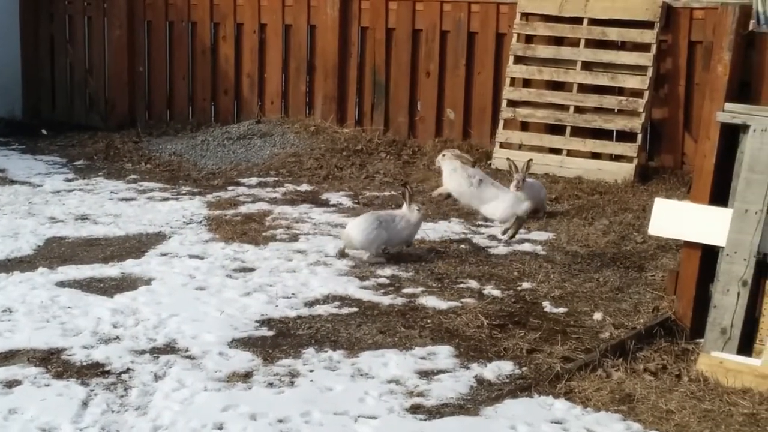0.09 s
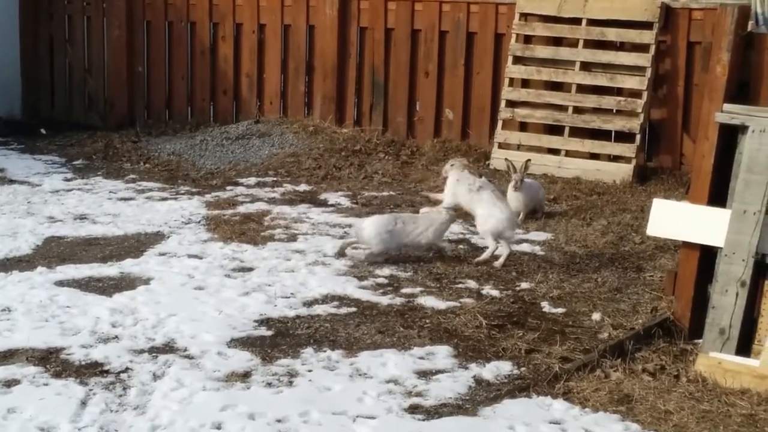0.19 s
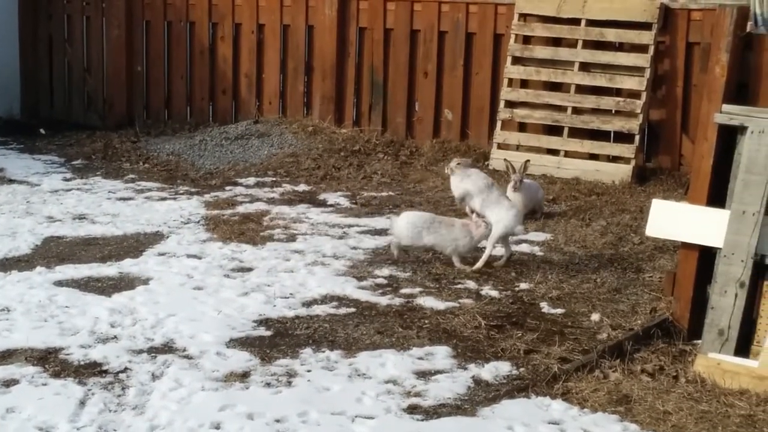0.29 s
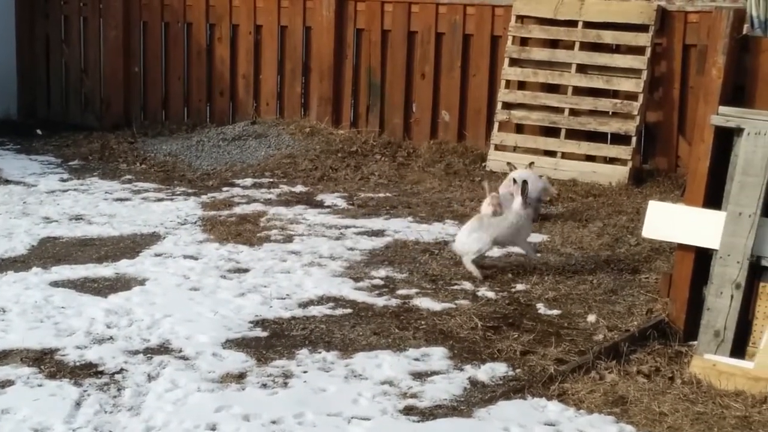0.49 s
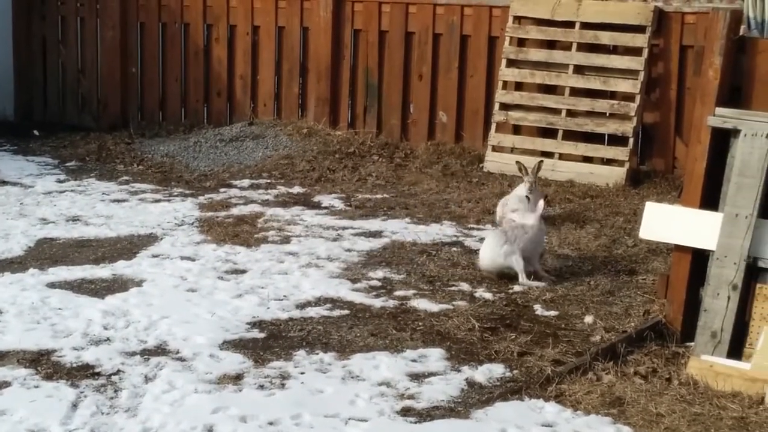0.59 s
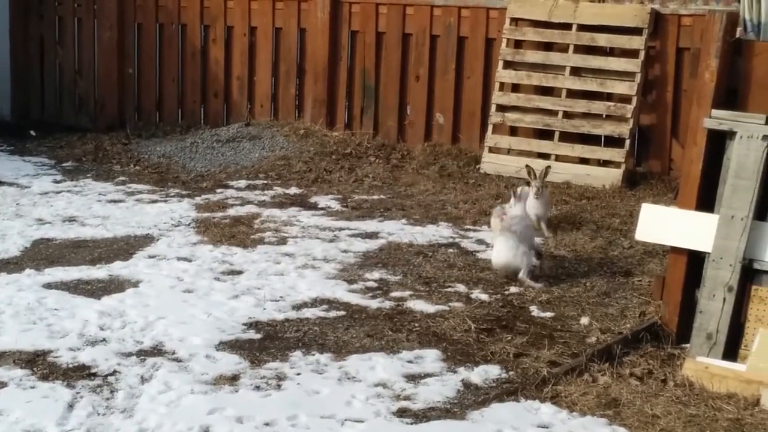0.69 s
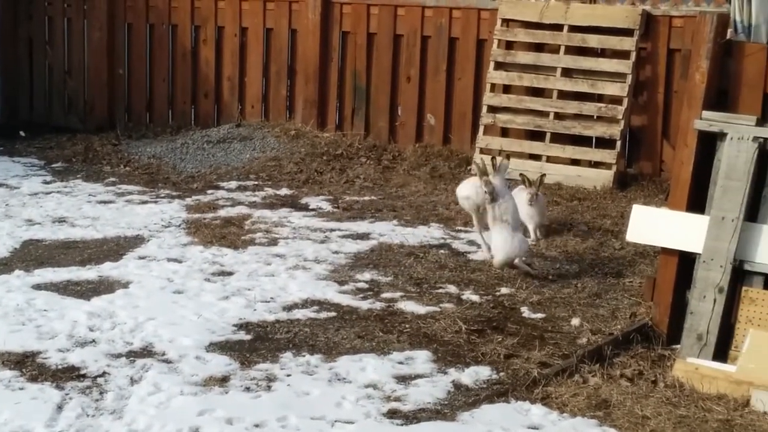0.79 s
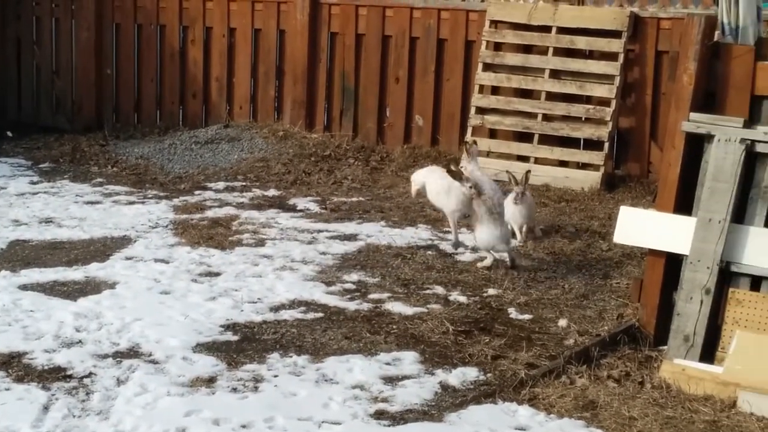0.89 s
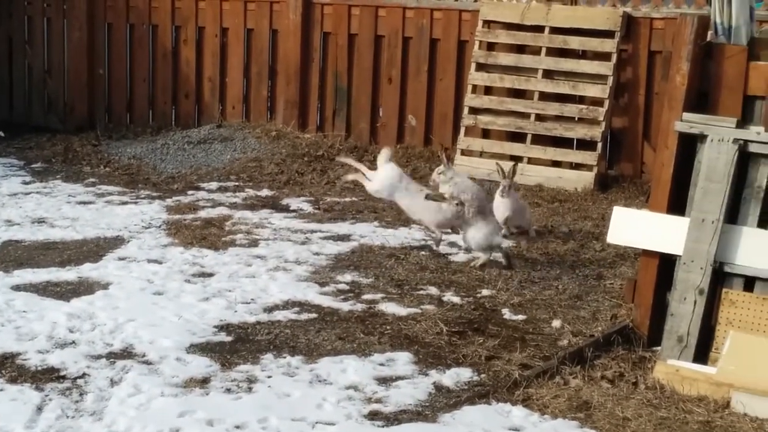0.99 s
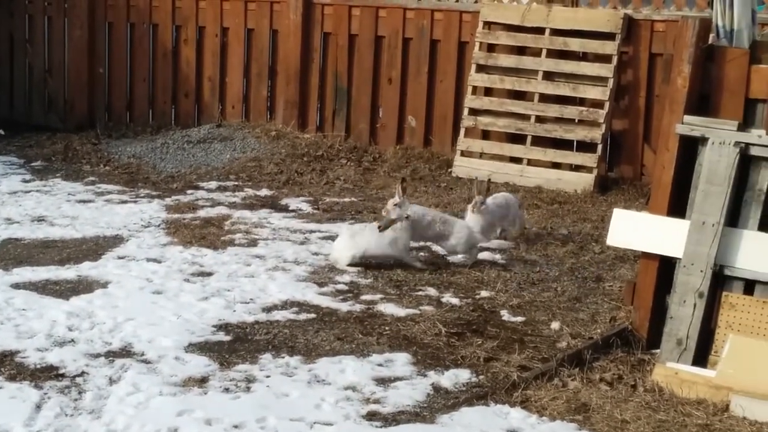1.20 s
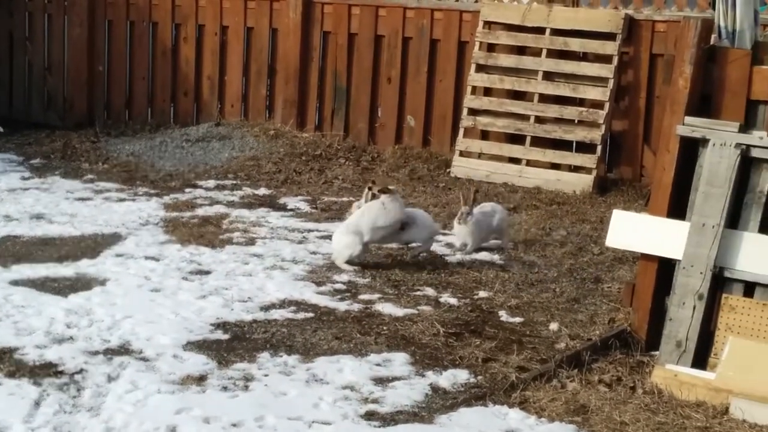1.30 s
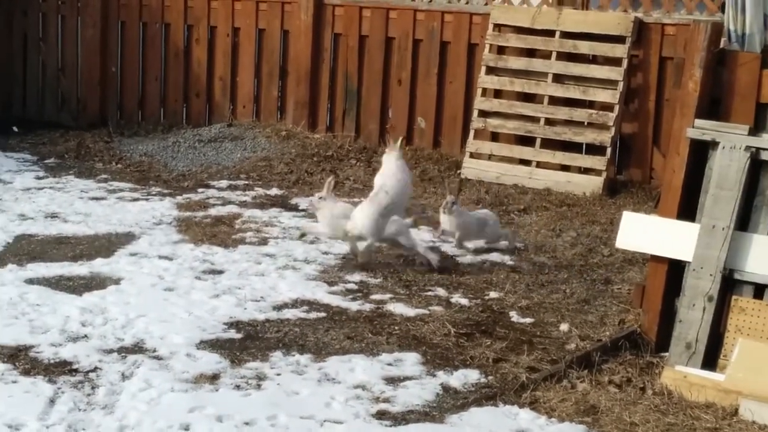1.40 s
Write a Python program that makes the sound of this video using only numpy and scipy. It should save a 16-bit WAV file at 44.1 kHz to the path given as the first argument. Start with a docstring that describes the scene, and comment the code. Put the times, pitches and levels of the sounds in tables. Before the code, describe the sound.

Hares grunt gruffly while scuffling in a quiet fenced yard. A clipped low grunt opens, then a breathy falling one at 0.2 s with soft paw thumps near 0.1 and 0.2. The loudest, raspiest grunt runs 0.4-0.65 s. Small low grunts follow, a rough one at 0.92, a faint grass snap at 0.98, a higher falling grunt at 1.08, another at 1.17, and a weak last one at 1.32.

```python
"""A fenced yard, a few metres from the hares scuffling in it: quick gruff grunts, paws and short echoes.
Each grunt is a train of vocal-fold pulses: a soft hum at the pitch, and sharp pulses with
breath ringing a short throat. Paws thump the ground as low decaying pushes and one snaps dry grass,
over a faint outdoor floor of coloured noise."""
import sys
import numpy as np
from scipy import signal
from scipy.fft import rfft, irfft
from scipy.io import wavfile
from scipy.ndimage import uniform_filter1d

SR = 44100
rng = np.random.default_rng(int(sys.argv[2]) if len(sys.argv) > 2 else 0)


def convert_level_to_amplitude(level_db):
    """Map a level in decibels to its linear amplitude factor."""
    exponent = np.asarray(level_db, float) / 20
    return 10 ** exponent


def log_audio(samples):
    """Write samples as a 16-bit WAV file to the path given in sys.argv[1]."""
    # one column per channel
    frames = np.atleast_2d(samples).T
    # limit to full scale, then quantise
    limited = np.clip(frames, -1, 1)
    pcm = np.round(limited * 32767).astype(np.int16)
    wavfile.write(sys.argv[1], SR, pcm)


N = 63945


def evened(x):
    """Scales to rms 1."""
    return x / np.sqrt(np.mean(x ** 2) + 1e-20)


def add(mix, s, sound):
    """Mixes a sound in at time s, in seconds."""
    part = mix[round(s * SR):][:len(sound)]
    part += sound[:len(part)]


def resonate(x, hz, width):
    """A resonance applied twice that follows the curve hz."""
    turn = np.exp(2j * np.pi * np.cumsum(hz * np.ones(len(x))) / SR)
    r = np.exp(-np.pi * width / SR)
    smooth = signal.lfilter([(1 - r) ** 2], [1, -2 * r, r * r], x / turn + 1e-18)
    return 2 * (turn * smooth).real


def outdoor_floor():
    """Steady faint noise, shaped in the spectrum to lean towards the low end."""
    # Spectrum of the floor. Each row: frequency in Hz, relative level in dB.
    floor_spectrum = [(35, -13.5), (60, -4), (756, -11), (2650, -30), (15500, -29.5)]
    floor_db = -67.5
    f, level_db = np.transpose(floor_spectrum)
    hz = np.fft.rfftfreq(N, 1 / SR)
    shape = convert_level_to_amplitude(np.interp(np.log(hz + 1), np.log(f), level_db))
    return convert_level_to_amplitude(floor_db) * evened(irfft(rfft(rng.standard_normal(N)) * shape, N))


def yard_echoes(x):
    """Sparse echoes off fence and ground, dying quickly."""
    t60_s, echo_db = 0.083, -9.5
    taps = np.zeros(SR // 2)
    at = np.arange(300, SR // 2 - 20, 20)  # one echo of random sign in every 20 samples
    taps[at + rng.integers(0, 20, len(at))] = rng.choice([-1., 1.], len(at))
    tail = taps * convert_level_to_amplitude(-60 * np.arange(len(taps)) / SR / t60_s)
    return convert_level_to_amplitude(echo_db) * signal.fftconvolve(x, tail / np.linalg.norm(tail))[:N]


def paw_thumps():
    """Paws landing: each a soft low push through the ground that swells and dies away."""
    # Landings of the paws. Each row: start in seconds, level in dB.
    landings = [(0.076, -40.5), (0.202, -37.5), (.425, -47.5), (1.08, -48.5), (1.194, -51)]
    thump_hz, rise_s = 65, 0.0095
    t = np.arange(SR // 5) / SR
    u = t / rise_s
    push = u * np.exp(1 - u) * np.sin(2 * np.pi * thump_hz * t)
    x = np.zeros(N)
    for s, db in landings:
        add(x, s, convert_level_to_amplitude(db) * push)
    return x


def grass_snaps():
    """A paw snaps dry grass: a single-sample click rings a broad bright resonance."""
    # Snaps of the grass. Each row: start in seconds, drive of the resonance in dB.
    snaps = [(0.9824, -36.5)]
    snap_hz, snap_width_hz = 7340, 5000
    x = np.zeros(N)
    for s, db in snaps:
        add(x, s, convert_level_to_amplitude(db) * np.array([3.]))
    return resonate(x, snap_hz, snap_width_hz)


def grunt(rows, throat, alternate):
    """Jittered pulses and puffs of breath ring the throat; the hum follows the same cycles."""
    # Share of breath noise in the throat. Each row: time in seconds, roughness from 0 to 1.
    roughness = [(.19, .65), (.275, .45), (.44, .8), (.456, .15), (.575, .4), (.585, .9), (.912, .9),
                 (.917, .15), (.953, .2), (.962, .8), (1.004, .15), (1.075, .65), (1.14, .7), (1.16, .22)]
    # The mouth opens and closes, shifting the two lower resonances. Each row: time in seconds, factor.
    mouth_opening = [(.91, 1.066), (.932, 1.18), (.956, 0.76), (.975, 0.8)]
    # Upper throat resonances. Each row: frequency in Hz, width in Hz, relative level in dB.
    upper_throat = [(6300, 750, 0), (7800, 700, -5), (10600, 3200, -17)]
    jitter, shimmer_db, puff_decay_cycles = .19, 3.6, .3
    first_width_hz, second_width_hz, third_width_hz = 850, 900, 850
    first_lag_s = .0012
    tear_db, tear_low, tear_high = 1.5, 0.95, 1.09  # factors on the first and second resonance
    octave_db, boom_width_hz, boom_db = -11.5, 74, -4
    chest_hz, chest_width_hz = 625, 504
    low_hz, chest_slope = 200, 3.26  # alternation and chest grow as the pitch sinks towards low_hz
    fade_s = 0.0051

    s, hum_db, hz, rasp_db, treble_db = np.transpose(rows)
    first_hz, second_hz, second_db, third_db, chest_db, third_hz = throat
    t = np.arange(s[0], s[-1], 1 / SR)
    line = lambda v: np.interp(t, s, v)
    pitch = line(hz)
    rough = np.interp(t, *np.transpose(roughness))
    mouth = np.interp(t, *np.transpose(mouth_opening))
    low = np.minimum(low_hz / pitch, 1) ** chest_slope

    # vocal folds: rough cycles are uneven in length
    slow = rng.standard_normal(SR)[:len(t)]
    chance = rng.standard_normal((8, SR))[:, :len(t)]
    wobble = evened(uniform_filter1d(slow, size=200))
    turns = np.cumsum(pitch * (1 + jitter * rough * wobble)) / SR
    pulses = np.diff(np.floor(turns), prepend=0) * np.sqrt(SR / pitch)
    puffs = evened(rough + np.exp(-(turns % 1) / puff_decay_cycles)) * chance[:4]

    # four drives: first, second, third and upper resonances, chest; each is struck unevenly
    size = convert_level_to_amplitude(shimmer_db * np.sqrt(rough) * chance[4:, turns.astype(int)])
    breath = rough ** np.array([[1], [1], [.3], [1]])  # the upper throat is breathier
    drive = size * (np.sqrt(breath) * puffs - np.sqrt(1 - breath) * pulses)

    late = np.roll(drive[0], round(first_lag_s * SR))
    first = resonate(late, mouth * first_hz, first_width_hz)
    first = evened(resonate(first, mouth * first_hz, 2 * first_width_hz))
    second = resonate(drive[1], mouth * second_hz, second_width_hz)
    second = evened(resonate(second, mouth * second_hz, 2 * second_width_hz))
    third = evened(resonate(drive[2], third_hz, third_width_hz))
    upper = sum((-1) ** k * convert_level_to_amplitude(db) * resonate(drive[2], f, w)
                for k, (f, w, db) in enumerate(upper_throat))

    # rough breath spreads from below the first to above the second resonance
    band = [tear_low * first_hz, tear_high * second_hz]
    tear = evened(signal.sosfilt(signal.butter(3, band, 'band', fs=SR, output='sos'), size[3] * puffs[3]))
    clear = np.sqrt(1 - rough * rough)
    rasp = clear * (first + convert_level_to_amplitude(second_db) * second) + convert_level_to_amplitude(tear_db) * rough * rough * tear

    # hum: pitch and octave with strong and weak cycles, then the ringing chest and its breathy low body
    hum = -np.sin(2 * np.pi * turns) - convert_level_to_amplitude(octave_db) * np.sin(4 * np.pi * turns)
    hum *= clear * (1 + alternate * low * np.cos(np.pi * turns))
    hum = hum + convert_level_to_amplitude(boom_db) * rough * evened(resonate(drive[3], pitch, boom_width_hz))
    chest = evened(resonate(drive[3], chest_hz, chest_width_hz))
    hum = evened(hum) + convert_level_to_amplitude(chest_db) * low * chest

    out = convert_level_to_amplitude(line(hum_db)) * hum + convert_level_to_amplitude(line(rasp_db)) * rasp
    out = out + convert_level_to_amplitude(line(rasp_db + treble_db) / 2 + third_db) * third
    out = out + convert_level_to_amplitude(line(treble_db)) * evened(upper)
    edge_s = np.minimum(t - s[0] + (s[0] == 0), s[-1] - t)  # a grunt at time 0 has no fade-in
    return s[0], out * np.clip(edge_s / fade_s, 0, 1)


def hare_grunts():
    """Quick gruff grunts, each with its own pitch and level curves and throat shape."""
    # Course of the voice, one table per grunt. Each row: time in seconds, hum in dB, pitch in Hz,
    # rasp in dB, treble in dB.
    voices = [
        [(0, -40.5, 181.7, -38.5, -69.5), (.02, -52, 164, -78, -81), (.055, -45.5, 160.4, -69, -109),
         (.12, -66, 110.7, -123, -99)],
        [(.16, -67, 311.2, -70, -105), (.18, -44, 304.3, -47, -70), (.275, -44, 190.8, -47.5, -77.5),
         (.318, -45, 174, -49, -100), (.33, -57, 182, -82, -111), (.38, -62.5, 169, -66.5, -111)],
        [(.398, -76, 295.7, -63, -118), (.41, -49.5, 318, -45.5, -63.5), (.468, -40, 239.2, -33.5, -46),
         (.481, -39.5, 241.1, -43.5, -48.5), (.51, -33, 244.3, -30.5, -37.5), (.533, -48, 268.7, -32.5, -34.5),
         (.545, -36, 238.8, -31.5, -35.5), (.568, -35, 236.5, -35, -37.5), (.585, -43, 215, -45.5, -66),
         (.635, -43.5, 210.3, -49.5, -55.5), (.655, -54, 211.5, -59, -94)],
        [(.652, -61, 201.3, -45, -65), (.665, -47.5, 198.2, -77, -55), (.695, -41.5, 196.5, -63, -84),
         (.72, -67, 209.2, -102, -83), (.735, -47, 200, -50.5, -80), (.76, -74, 200, -101, -99)],
        [(.785, -67, 220, -71, -122), (.88, -63.5, 221.4, -67, -109), (.9, -49, 237, -47.5, -108),
         (.914, -49.5, 246.6, -41, -81), (.922, -39, 239.1, -38, -46.5), (.953, -42.5, 220, -37, -43),
         (.966, -51, 221.2, -54.5, -90), (.995, -82, 211, -58, -75)],
        [(.998, -81, 190.3, -57, -77), (1.008, -55.5, 181.6, -49.5, -71), (1.028, -46.5, 186.5, -68, -78),
         (1.055, -77, 170.8, -103, -93)],
        [(1.07, -89, 400.5, -60, -104), (1.08, -41.5, 399, -37.5, -63), (1.15, -48, 251.7, -51.5, -83)],
        [(1.14, -51.5, 244.7, -54, -79), (1.165, -39.5, 229.3, -50.5, -69.5), (1.19, -41, 236.6, -41.5, -64),
         (1.212, -43.5, 234.6, -53.5, -78), (1.232, -69, 245, -104, -76)],
        [(1.3, -76, 193.3, -87.5, -101), (1.318, -48, 191.6, -72.5, -83.5), (1.37, -76, 184.3, -103, -86)],
    ]
    # Throat of each grunt. Each row: first resonance in Hz, second in Hz, second in dB, third in dB,
    # chest in dB, third in Hz.
    throats = [(926, 2730, 1, -0.5, -17.5, 3650), (1490, 2810, -5, -3.5, -12.5, 5170),
               (1296, 2798, 3, -1.5, -8.5, 4460), (1980, 2460, 4, -1.5, -7.5, 3730),
               (1614, 2440, -0.5, -2.5, -3.5, 4360), (1490, 2100, 0, 1, -14, 3300),
               (1450, 2290, -4, 1.5, -1, 3570), (1890, 2810, -1, -3, 2.5, 2900),
               (1440, 3670, 15.5, -15.5, -10.5, 1900)]
    # Strong and weak cycles alternate in the low-pitched part. Each entry: depth from 0 to 1, per grunt.
    alternations = [0.95, 0.55, 0.083, 0.08, 0.18, 0.075, 1, 0.32, 1]
    x = np.zeros(N)
    for row in zip(voices, throats, alternations):
        add(x, *grunt(*row))
    return x


def scene():
    """Hares and their paws, the echoes of both and the floor."""
    hares = grass_snaps() + hare_grunts() + paw_thumps()
    return (hares + yard_echoes(hares) + outdoor_floor())[None]


def top_cut(x):
    """Nothing passes above the cut-off."""
    return signal.sosfilt(signal.butter(12, 15710, fs=SR, output="sos"), x)


def record(dry):
    """The microphone loses the deep bass."""
    mic_low_hz = 57
    mix = signal.lfilter(*signal.butter(2, mic_low_hz, 'high', fs=SR), dry)
    return top_cut(mix)


dry = scene()
out = record(dry)
log_audio(out)
```